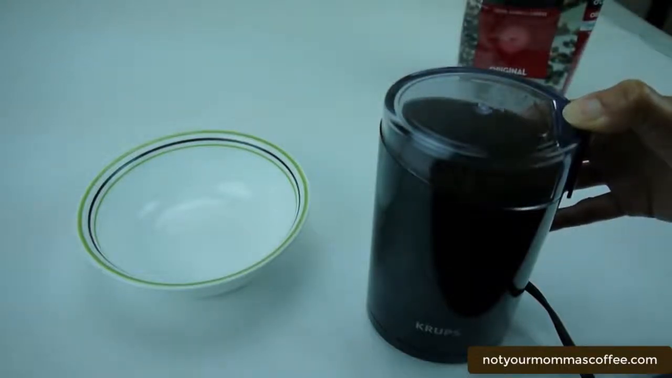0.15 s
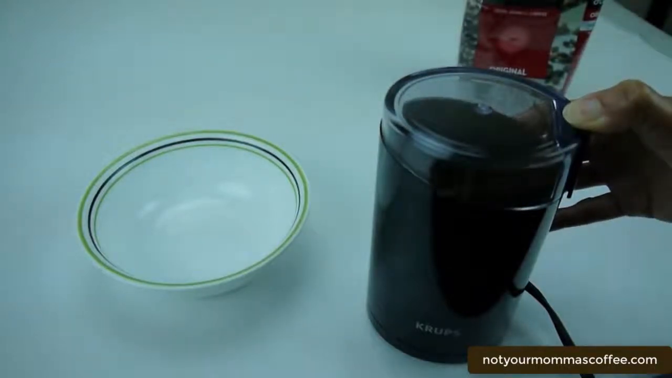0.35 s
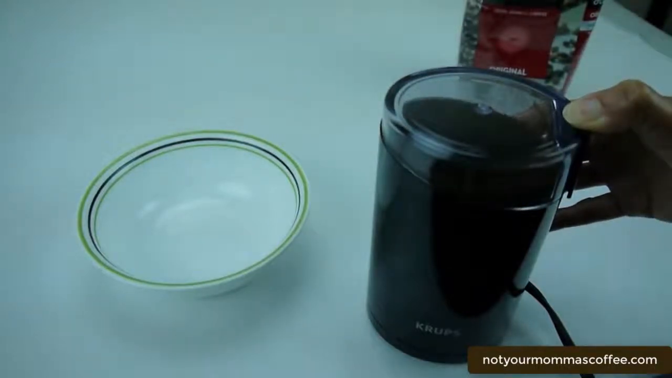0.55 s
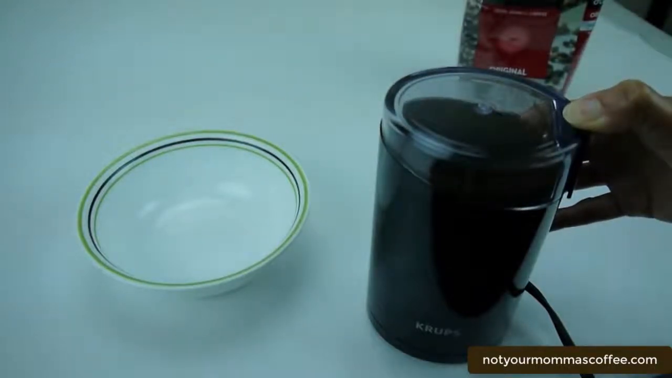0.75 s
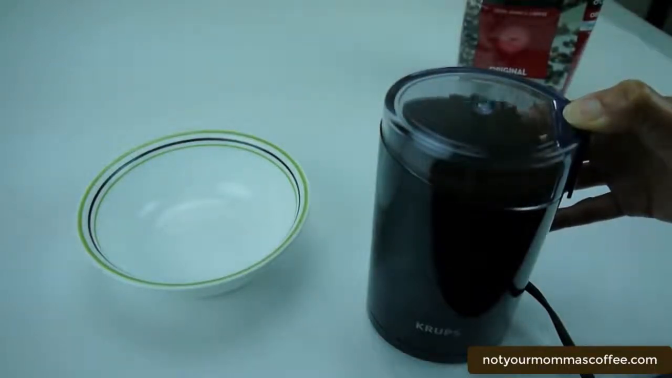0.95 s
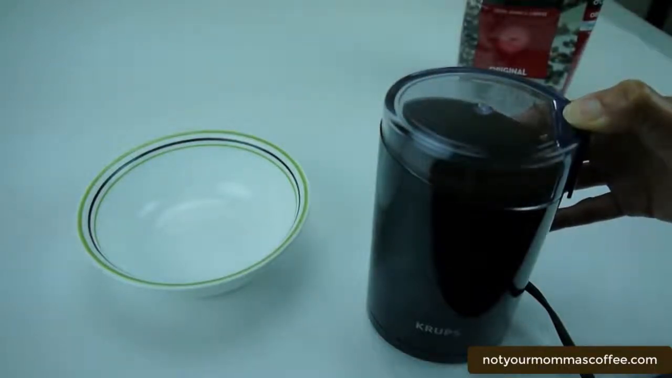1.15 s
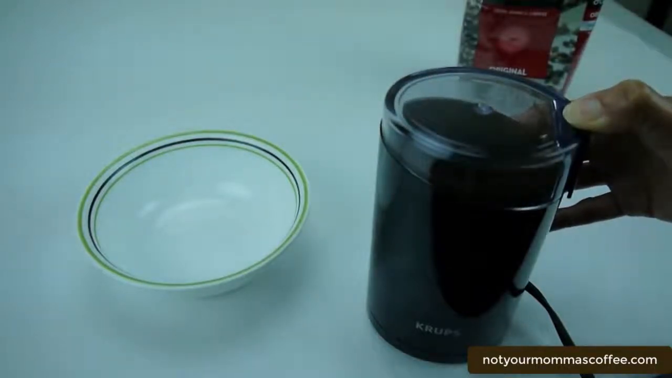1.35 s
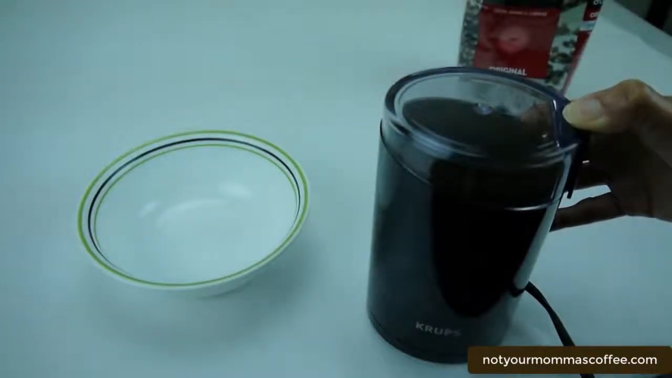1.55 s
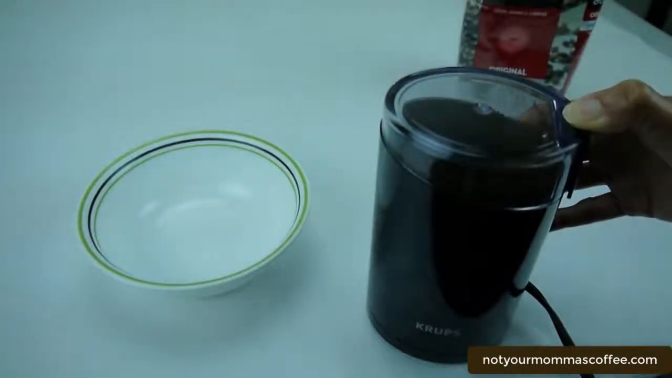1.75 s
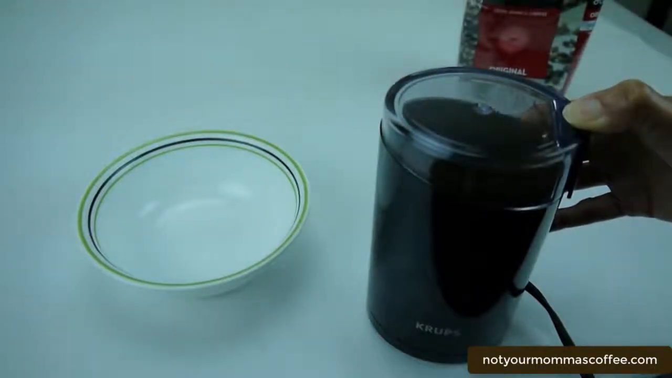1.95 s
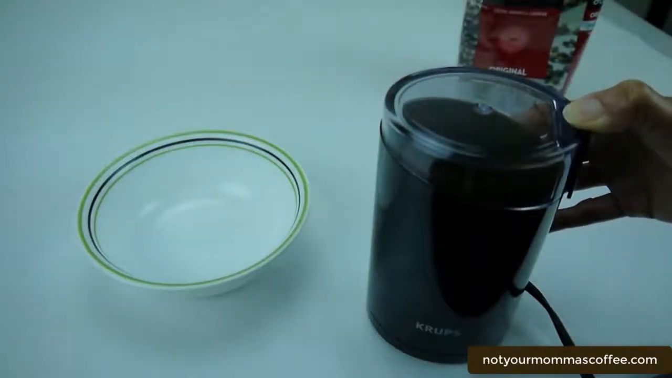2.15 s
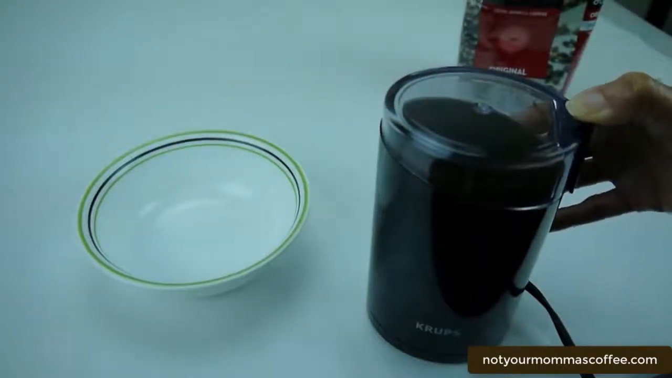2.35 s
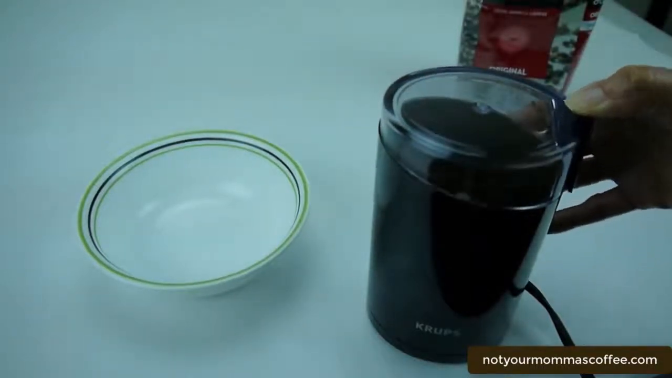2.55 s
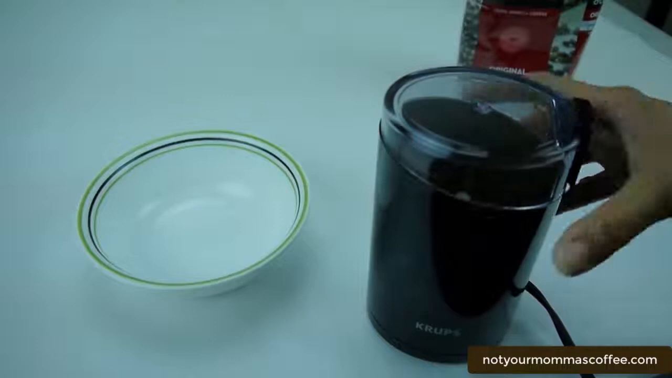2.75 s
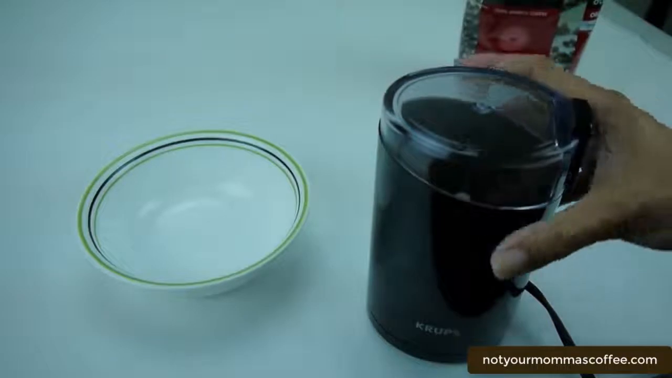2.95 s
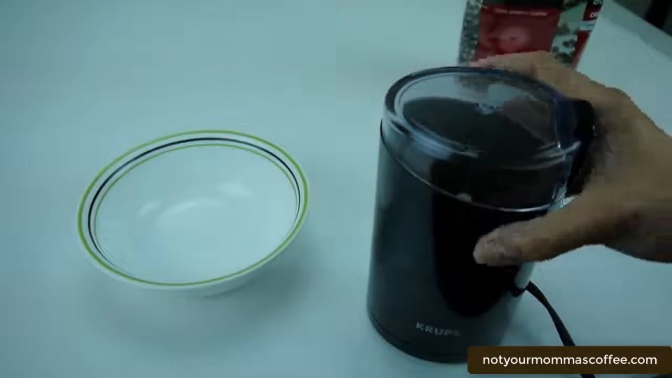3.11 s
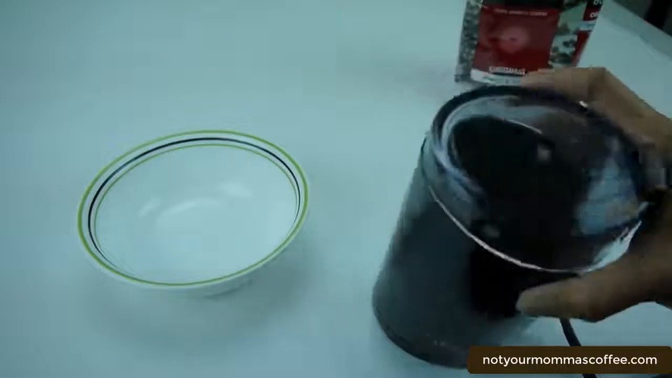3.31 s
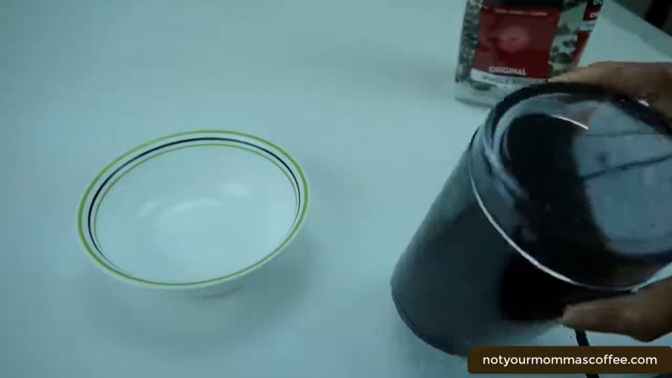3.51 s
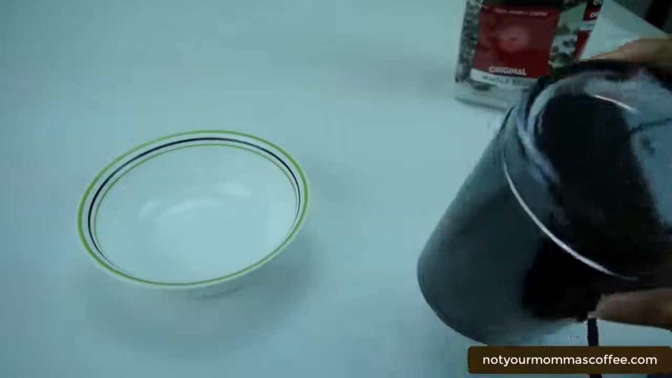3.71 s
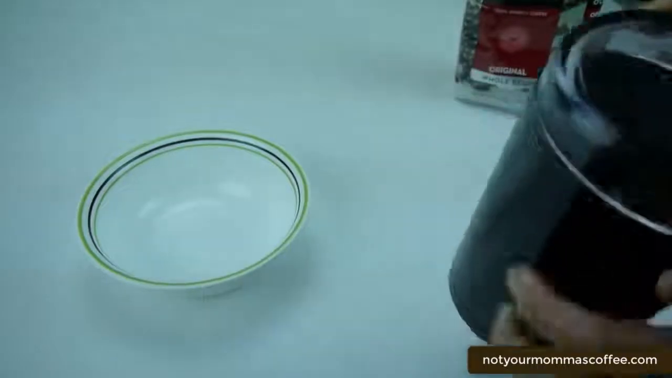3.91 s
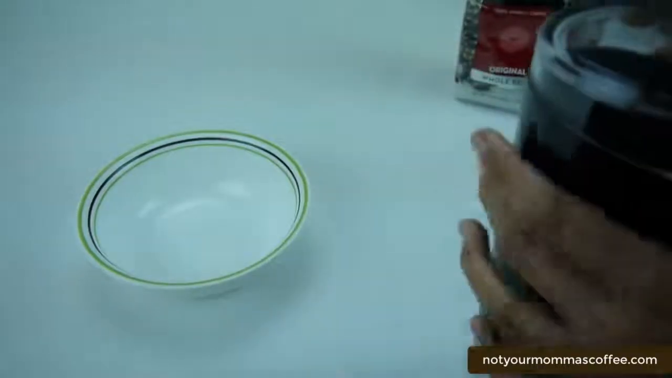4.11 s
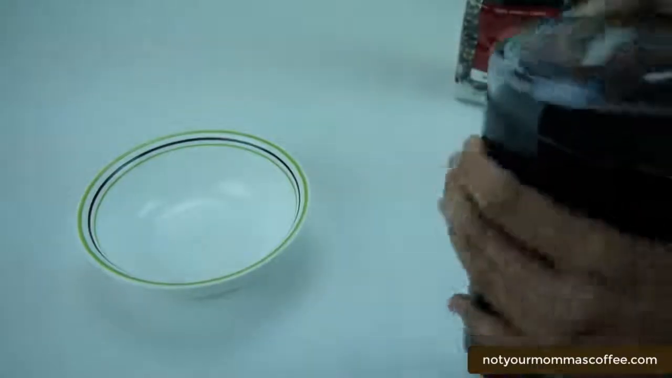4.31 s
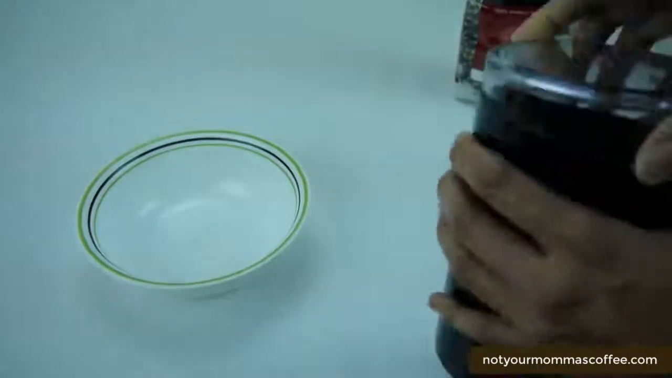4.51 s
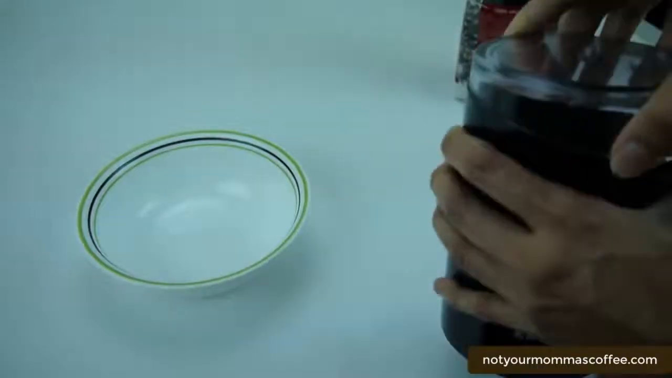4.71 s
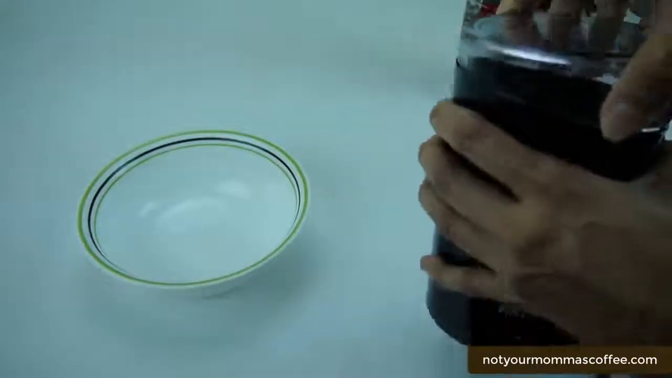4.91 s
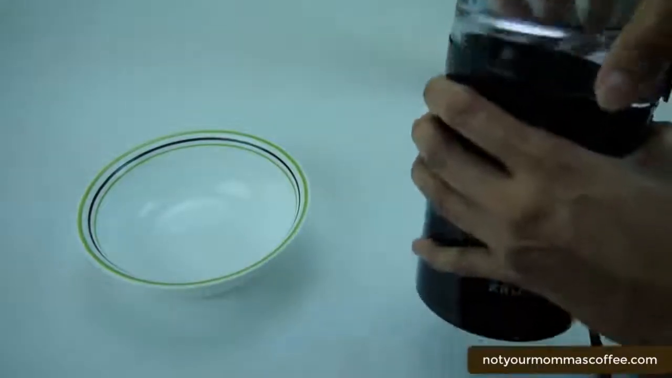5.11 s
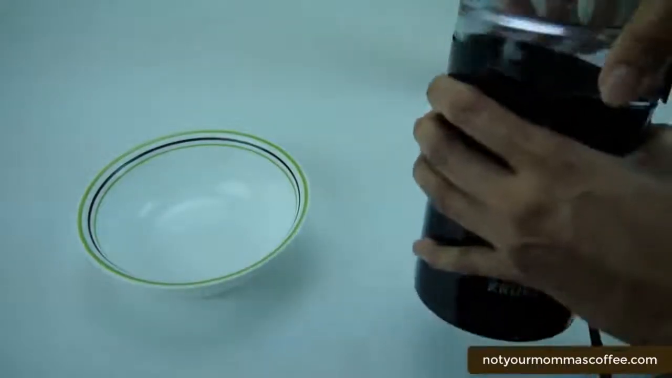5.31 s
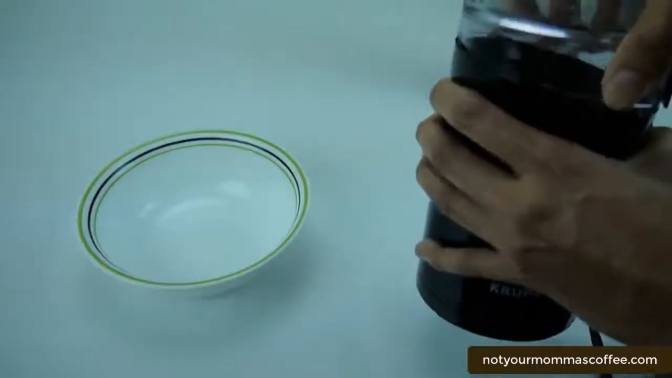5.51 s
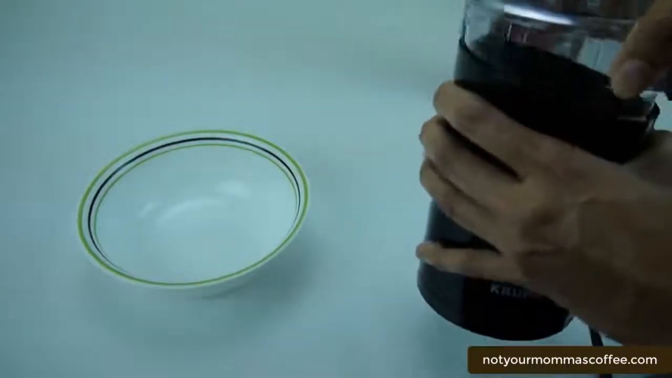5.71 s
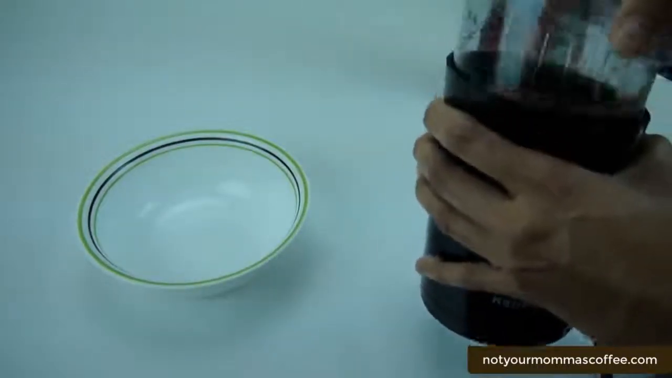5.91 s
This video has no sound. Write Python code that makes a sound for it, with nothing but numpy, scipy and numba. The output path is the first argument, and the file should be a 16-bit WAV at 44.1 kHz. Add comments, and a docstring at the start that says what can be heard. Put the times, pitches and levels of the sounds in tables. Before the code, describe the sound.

Harsh, gritty whir of a coffee grinder on a counter, spinning down after about three seconds, followed by faint plastic clicks and lid scuffs.

```python
"""An electric blade coffee grinder runs on a kitchen counter: lines on the turn rate whine, a hum throbs,
and grounds (noise) and bean chips (bursts) excite the resonances of cup, lid and blade.
The button is let go: the whine and hum die, and the rotor coasts to rest while the counter booms.
Hands then lift the grinder and twist its lid loose: ticks ring the shell, strokes of gritty noise rub,
and the catch gives one dull pop. Room tone lies beneath."""
import sys
import numpy as np
from scipy import signal
from scipy.fft import rfft, irfft
from scipy.io import wavfile
from numba import njit

SR = 44100
rng = np.random.default_rng(int(sys.argv[2]) if len(sys.argv) > 2 else 0)


def to_wav(s):
    """Save 16-bit WAV."""
    ch = np.atleast_2d(s).T  # columns
    pcm = np.round(np.clip(ch, -1, 1) * 32767)  # PCM
    wavfile.write(sys.argv[1], SR, pcm.astype(np.int16))


def ratio(d):
    """dB to gain"""
    e = np.asarray(d, float) / 20
    return 10 ** e


N = 262836
TIME_S = np.arange(N) / SR

# rotor: creeps up as the beans get finer, then brakes by friction once the button is let go
FULL_SPEED_HZ, START_HZ, CREEP_HZ_PER_S = 388, 386.6, 1.0
RELEASE_S, BRAKE_HZ_PER_S, BRAKE_ONSET_S = 2.827, 680, 0.017

# grounds whirling: level at full speed, exponent on the speed, speed share where only settling dust is left
WHIRL_DB, WHIRL_POWER, SETTLING_SHARE, SETTLED_S = -29.5, 1.1, .018, 3.72
SWIRL_LAG_S = 0.035   # the grounds lag behind the blade
# treble of the whirl, and its change as the powder gets fine from that moment on
TREBLE_DB, FINER_S, FINER_DB = 3.5, 1.93, -1
STALL_SHARE, STALL_TREBLE_DB = 0.14, -11   # treble lost as the blade stalls below this speed share
RUMBLE_DB, SLOW_RUMBLE_DB = -4.5, 10   # rumble at full speed, and its gain towards standstill
# slower dust loses its finest sizzle; near standstill the edge sinks further
SIZZLE_HZ, SIZZLE_LOSS_DB = 13800, -46
STALL_SIZZLE_HZ, STALL_SIZZLE_DB = 11800, -29.5
# bean chips thrown hard: start_s, peak_db (of the blow that drives the cup),
# dull_db (dull part against the bright, where a chip strikes the blade rather than the lid)
CHIP_CRACKS = [(0.0638, -15.5, -1), (0.1986, -20, -3.5), (0.351, -18.5, -4.5), (0.3925, -16, -6),
               (0.415, -16.5, -1.5), (0.439, -20, 0), (0.63, -22, -8), (0.6416, -17, -10),
               (0.8788, -15.5, -1), (0.9123, -16.5, -1.5), (1.05, -20, 2.5), (1.271, -17, -6),
               (1.3826, -25, -6.5), (1.4095, -8, -1), (1.418, -19.5, -4), (1.436, -22, -8),
               (1.449, -20.5, 4.5), (1.4815, -18, -1), (1.524, -23, -7), (1.539, -22, -2.5),
               (1.6093, -21, -11), (1.6692, -17, -7.5), (1.733, -27, -5), (1.8555, -20, -5),
               (1.8715, -15, -5.5), (2.1256, -14, -10), (2.2816, -18, -7), (2.332, -24.5, -6),
               (2.35, -26, -6), (2.378, -21.5, -7.5), (2.4228, -18, -6), (2.62, -22, -2), (2.77, -23, 0),
               (2.8102, -26.5, -7), (2.949, -33, -6), (2.9746, -18, 2.5), (3.013, -25, -8),
               (3.035, -25.5, 4), (3.039, -24.5, 4), (3.0937, -17.5, 5.5), (3.1824, -23, 2),
               (3.256, -27, 1.5)]
# bright and dull bands of a crack; slower chips thud on the cup wall as well
SHARD_HZ, DULL_SHARD_HZ, SLOW_SHARD_HZ = [5930, 9750], [3220, 5070], [1830, 2600]
RATTLE_SHARE, RATTLE_S = 0.28, 0.0078   # bits rattling on after a crack
WAVERS_BELOW_HZ, WALL_HZ = 1500, 2030   # cup modes that waver with the load; the mode of the cup wall
# cup and lid resonances: centre_hz, width_hz, level_db (relative)
CUP_MODES = [(336.7, 40, 9), (505, 24, -6), (690, 90, -3.5), (760, 27, 8.7), (868, 40, 5), (1141, 42, 0),
             (1293, 50, -5), (1010, 55, -4.5), (1500, 43, -3.5), (2045, 300, -1.3), (WALL_HZ, 25, -5.5),
             (2500, 80, -22.5), (3495, 37, 1), (6475, 120, -10), (7990, 180, -2), (8950, 30, -5.5),
             (9370, 180, -6), (13450, 110, 6), (14400, 170, 7.1)]
# blade modes, stiffened by the spin: rest_hz, full_speed_hz, width_hz, level_db (relative)
BLADE_MODES = [(4320, 4875, 130, 7), (4230, 4720, 57, 0.5), (4170, 4300, 65, -8.5), (9900, 10350, 250, -1)]
# towards standstill the grounds leave the lid and slide along the cup wall; the unloaded blade rings freely
LID_SLOW_DB, WALL_SLOW_DB, BLADE_SLOW_DB = -32.5, 7, 6.5
# overall spectrum of the grinding: frequency_hz, level_db (relative)
GROUNDS_SPECTRUM = [(100, -23), (240, -43), (400, -11), (600, -25), (900, -19), (1450, -25.5), (1900, -8.5),
                    (3300, -11.5), (5660, -12), (8150, -8.5), (11500, -16), (12700, -22), (14300, -9.5),
                    (14800, -25.5)]
SHUDDER_DB, SHUDDER_HZ = 0.5, [200, 1106]   # broad rumble of the body while the rotor brakes, against the whirl
# the counter booms while the slowing rotor passes its resonance
COUNTER_HZ, COUNTER_REACH_HZ, COUNTER_DB = 134.7, 60, 8.5

# motor lines: turn_multiple, throb_multiple (added), level_db (against the whine), wobble_db
MOTOR_LINES = [(1, 1, -25.5, 9.5), (1, -1, -63.5, 2.5), (2, 0, -17, 5), (3, 0, -21, 7), (3, 1, -19, 6),
               (4, 0, -24, 8.5), (5, 0, -14, 7.5), (8, 0, -1, 1.5), (8, -1, -11, 2), (9, 0, -10.5, 3.5)]
THROB_HZ = 120   # twice the mains frequency
WHINE_DB, WHINE_LOSS_DB_PER_S = -43, 496   # motor lines, dying once the current is cut
HUM_DB, HUM_HANG_S = -49, 0.076   # hum; 10 dB down this long after the release
# unbalance tone, swelling as the load shifts: time_s, level_db
UNBALANCE_LEVEL = [(0, -43.5), (.7, -45), (1.1, -41.5), (1.6, -43.5), (2.4, -40.5), (2.8, -45.5),
                   (2.9, -46)]
MOUNT_HZ, BELOW_MOUNT_DB_PER_HZ = 304, 1   # the tone dies below the resonance of the mount

# lid and body ticks in the hands: start_s, strength_db, clack_hz, knock_db, snap_db (both against the strength)
HAND_TICKS = [(3.4578, -47, 2030, -27, 4), (3.459, -44, 3450, -25, -8), (3.4657, -46.5, 4020, -25, 2),
              (3.489, -49, 3300, -16, -2), (3.6142, -60, 1900, -23, -5), (3.642, -52, 8580, -25, -5),
              (3.769, -52, 3300, -23, -1), (3.774, -51, 2090, -23, -4), (4.2933, -62, 2030, -5, -14),
              (4.594, -45, 1980, -28, -13), (4.596, -48, 3300, -27, -10), (4.6094, -48, 3370, -27, -10),
              (4.6664, -50, 2040, -13, 1), (4.7108, -47.5, 2040, -28, 5), (4.7635, -43.5, 1950, -28, 10),
              (4.7676, -35.5, 6860, -29, 0.5), (4.7824, -35.5, 3300, -29, -8),
              (4.9144, -56, 2650, -21, -18), (4.929, -54, 2030, -25, -18), (4.935, -55, 2700, -25, -18),
              (4.972, -47, 2030, -27, -14), (5.006, -48, 2100, -20, -11), (5.013, -57, 550, -6, -20),
              (5.021, -48, 2030, -28, -8), (5.037, -48, 2030, -27, -20), (5.0674, -50.5, 2010, -32, -1),
              (5.2175, -56, 4940, -18, 0), (5.241, -52, 2220, -10, -13), (5.285, -61, 3300, -27, -12),
              (5.3067, -51, 2000, -28, -10), (5.3517, -47.5, 2200, -11, 0), (5.391, -51, 1940, -12, -15),
              (5.4236, -52, 1990, -9, -9), (5.46, -46, 2100, -8.5, -4), (5.517, -53, 3400, -19, -11),
              (5.552, -52, 3000, -25, -3), (5.5554, -42, 2030, -26, -9), (5.571, -62, 704, 1, -20),
              (5.587, -55, 2050, -18, -20), (5.6138, -47, 1970, -12, 1), (5.683, -54, 2240, -8, 0),
              (5.686, -56.5, 590, 2.5, -20), (5.7038, -50, 2010, -7, -12), (5.79, -44, 2060, -16, -20),
              (5.8114, -48, 2060, -4, -6), (5.8374, -52.5, 331, -10, -16), (5.843, -49, 1980, -20, -8),
              (5.8846, -56.5, 804, 1, -20), (5.8915, -63, 905, 1, -18), (5.896, -50, 2000, -5, -15),
              (5.909, -53, 2080, -15, -20), (5.9232, -44, 4770, -22, -17), (5.93, -48, 4640, -22, -2),
              (5.951, -53.5, 1300, -10, -15)]
# modes that a tick rings: frequency_hz, level_db (relative), t60_s
SHELL_MODES = [(417, 6, 0.015), (550, 8.5, 0.0077), (2030, -13.5, 0.067), (2160, -7, 0.034),
               (3360, -12, 0.049), (6070, -4.5, 0.032), (7400, -17, 0.03)]
# shell ring of a tick of reference strength; other ticks ring in proportion
RING_DB, REFERENCE_TICK_DB = -55, -47
SNAP_WAKES = .7   # the upper shell modes follow this share of the snap
LOOSE_S, SEATED_RING_DB = 4.4, -8   # until the lid is twisted loose, it damps the shell
CLACK_CYCLES, CLACK_GRIT = 9.6, 0.59   # a clack dies to 1/e in this many cycles; its noisy share
POP_S, POP_DB, POP_HZ, POP_DECAY_S = 4.9885, -32, 1450, 0.00056   # the lid catch lets go

# skin and lid rim rubbing, stroke by stroke: start_s, time_scale_s, bright_db
RUBBING_STROKES = [(4.442, 0.25, -79), (4.586, 0.034, -63), (4.663, 0.13, -73), (4.738, 0.13, -69),
                   (4.895, 0.092, -78), (4.972, 0.064, -65.5), (5.084, 0.081, -80), (5.195, 0.12, -64),
                   (5.346, 0.077, -72), (5.416, 0.11, -62), (5.562, 0.12, -72), (5.662, 0.1, -69),
                   (5.785, 0.062, -65.5), (5.875, 0.076, -69)]
# spectrum of the bright rubbing: frequency_hz, level_db (relative)
RUBBING_SPECTRUM = [(1470, -30), (2500, -11), (3390, 1.5), (5140, -3.5), (7460, -3.5), (13300, -16),
                    (14800, -11)]
# lid rim resonances: frequency_hz
RIM_MODES_HZ = [3300, 4480, 5900, 7250.]
# dull part of a stroke of reference strength, which follows only part of the strength
DULL_RUB_DB, DULL_FOLLOWS, REFERENCE_RUB_DB = -72.5, 0.43, -70

# bands that thin out now and then: centre_hz, width_hz, depth_bias (0-1)
THINNED_BANDS = [(240, 130, 1), (615, 150, .8), (1010, 100, .4), (1430, 130, .6)]
THIN_BASS_S, THIN_BASS_HZ, THIN_BASS_WIDTH_HZ = [2.94, 3.12], 150, 140   # the bass is thin for a moment
ROOM_T60_S, ROOM_DB = 0.21, -6
# side signal spectrum: frequency_hz, gain_db
SIDE_SPECTRUM = [(60, -5.5), (110, -12.5), (200, -16.5), (370, -14), (680, -10), (1260, -6), (2310, -12.5),
                 (4250, -12.5), (7800, -15.5), (12000, -9.5), (14300, -1)]
# room tone spectrum: frequency_hz, level_db (relative, per Hz)
ROOM_TONE_SPECTRUM = [(12, -34.5), (20, -26.5), (32, -31.5), (98, -21), (136, -30), (278, -39.5),
                      (481, -41), (567, -46.5), (787, -46), (2630, -59), (7660, -65), (9280, -55),
                      (11800, -62.5), (12600, -84)]
ROOM_TONE_DB, ROOM_TONE_SIDE_DB = -64.5, -95.5
# above this edge the room tone is fainter while the rotor runs fast
FAINTER_ABOVE_HZ, FAINTER_DB = 140, -22


def rms_one(x):
    """Normalisation: scales to unit root mean square."""
    return x / np.sqrt(np.mean(x ** 2) + 1e-20)


def since(s):
    """Elapsed time: seconds gone by since a moment, 0 before it."""
    return np.maximum(TIME_S - s, 0)


def drift(rate_hz):
    """Low-pass random process: twice-smoothed noise of spread 1, computed at every 40th sample."""
    r = np.exp(-80 * np.pi * rate_hz / SR)
    slow = signal.lfilter([1], [1, -2 * r, r * r], rng.standard_normal(N // 40 + 2002))[2000:]
    return np.interp(np.arange(N) / 40, np.arange(len(slow)), rms_one(slow))


def colour(x, spectrum):
    """Minimum-phase filtering: a folded cepstrum gives the causal response of a spectrum."""
    hz, db = np.transpose(spectrum)
    grid = np.maximum(np.fft.rfftfreq(8192, 1 / SR), 1)
    cepstrum = irfft(np.interp(np.log(grid), np.log(hz), db) * np.log(10) / 20)
    cepstrum[1:4096] *= 2
    cepstrum[4097:] = 0
    response = irfft(np.exp(rfft(cepstrum)))
    return signal.fftconvolve(np.atleast_2d(x), [response], axes=1)[:, :N]


def cut(x, hz, kind, order=2):
    """Butterworth filtering: maximally flat pass band."""
    return signal.sosfilt(signal.butter(order, hz, kind, fs=SR, output="sos"), x)


def split(x, hz, order):
    """Crossover: each half is filtered twice; returns low and high."""
    return [cut(cut(x, hz, kind, order), hz, kind, order) for kind in ("low", "high")]


@njit
def resonate(x, hz, width):
    """Two-pole resonance whose centre may move; gain 1 on top."""
    y, r = np.zeros(len(x)), np.exp(-np.pi * width / SR)
    for i in range(2, len(x)):
        pushed = (1 - r * r) / 2 * (x[i] - x[i - 2])
        y[i] = pushed + 2 * r * np.cos(2 * np.pi * hz[i] / SR) * y[i - 1] - r * r * y[i - 2]
    return y


def grains(per_s, spread_db, lasting_s):
    """Shot noise: random contacts, a few much larger than the rest, each a short noise burst; rms 1."""
    sizes = ratio(spread_db * np.minimum(rng.exponential(1, N), 2.9)) * (rng.random(N) < per_s / SR)
    r = np.exp(-1 / (lasting_s * SR))
    return rms_one(signal.lfilter([1], [1, -r], sizes) * rng.standard_normal(N))


def rotor():
    """Friction braking: a constant loss of speed after a short onset; returns turns per second."""
    off = since(RELEASE_S)
    braked = BRAKE_HZ_PER_S * (off - BRAKE_ONSET_S * (1 - np.exp(-off / BRAKE_ONSET_S)))
    return np.maximum(START_HZ + CREEP_HZ_PER_S * np.minimum(TIME_S, RELEASE_S) - braked, 0)


def chip_cracks(share):
    """Impact excitation: a chip shatters in a sharp noise burst and its bits rattle on."""
    t = np.arange(800) / SR
    out = np.zeros(N)
    burst = (1 - np.exp(-t / 0.00042)) * (np.exp(-t / 0.001) + RATTLE_SHARE * np.exp(-t / RATTLE_S))
    for s, peak_db, dull_db in CHIP_CRACKS:
        start = round(s * SR)
        bits = rng.standard_normal(len(t))
        shard = cut(bits, SHARD_HZ, "band") + ratio(dull_db) * cut(bits, DULL_SHARD_HZ, "band")
        shard += 2.5 * (1 - share[start]) * cut(bits, SLOW_SHARD_HZ, "band")
        blow = burst * shard
        out[start:start + len(t)] += ratio(peak_db) * blow / np.abs(blow).max()
    return out


def cup_and_blade(drive, speed, share):
    """Modal resonance: one drive excites the modes of cup, lid and spin-stiffened blade."""
    rung = ratio(-2.5) * cut(drive, 1300, "high") + ratio(-24) * drive
    for hz, width, db in CUP_MODES:
        centre, gain_db = np.full(N, float(hz)), db
        wavers = hz < WAVERS_BELOW_HZ
        if wavers:   # the low modes come, go and wander as the load shifts round the cup
            gain_db = db + 4.5 * share * np.minimum(drift(8), .8)
            centre = hz * (1 + 0.015 * drift(2))
        ring = resonate(drive, centre, float(width))
        if wavers:   # a second, wider pass steepens the skirts: the sound is thin between these modes
            ring = ratio(4.0) * resonate(ring, centre, width * 2.5)
        slow_db = LID_SLOW_DB if hz > 7000 else WALL_SLOW_DB * (hz == WALL_HZ)
        rung = rung + ratio(gain_db + slow_db * (1 - share)) * ring
    stiffening = (speed / FULL_SPEED_HZ) ** 2
    for rest_hz, full_hz, width, db in BLADE_MODES:
        centre = np.sqrt(rest_hz ** 2 + (full_hz ** 2 - rest_hz ** 2) * stiffening)
        gain = ratio(db + BLADE_SLOW_DB * (1 - share)) * share ** .2
        rung = rung + gain * resonate(drive, centre, float(width))
    return rung


def grinding(speed):
    """Source and resonator: dust hiss, grit and cracks all excite the same cup, lid and blade."""
    share = np.clip(speed / FULL_SPEED_HZ, 0, 1)
    slowed = 1 - share
    keep = np.exp(-1 / (SWIRL_LAG_S * SR))
    swirl = 1 - signal.lfilter([1 - keep], [1, -keep], slowed)
    level_db = WHIRL_DB + 20 * WHIRL_POWER * np.log10(np.maximum(swirl, 0) + SETTLING_SHARE)
    fading = np.clip((SETTLED_S - TIME_S) / 0.083, 0, 1)
    whirl = rng.standard_normal(N) + .5 * grains(450, spread_db=4.5, lasting_s=0.0018)
    drive = rms_one(whirl) * ratio(level_db + 0.97 * drift(21) + 0.12 * drift(1.6)) * fading
    drive = drive + chip_cracks(share)

    heard = colour(cup_and_blade(drive, speed, share), GROUNDS_SPECTRUM)[0] * ratio(12.0)
    body, sizzle = split(heard, SIZZLE_HZ, order=6)
    heard = body + ratio(SIZZLE_LOSS_DB * slowed) * sizzle
    body, sizzle = split(heard, STALL_SIZZLE_HZ, order=6)
    heard = body + ratio(STALL_SIZZLE_DB * slowed ** 3) * sizzle

    shudder_gain = ratio(level_db + SHUDDER_DB + 2.7 * drift(15)) * slowed ** 0.78 * fading
    shudder = shudder_gain * cut(rng.standard_normal(N), SHUDDER_HZ, "band", order=4)
    counter = np.full(N, COUNTER_HZ)
    boom = resonate(resonate(drive, counter, 40.), counter, 60.)
    passing = np.exp(-((speed - COUNTER_HZ) / COUNTER_REACH_HZ) ** 2)
    shudder = shudder + ratio(COUNTER_DB) * passing * boom

    treble_db = TREBLE_DB + FINER_DB * np.tanh(since(FINER_S) / 0.13)
    treble_db = treble_db + STALL_TREBLE_DB * np.maximum(1 - share / STALL_SHARE, 0)
    rumble_db = RUMBLE_DB + SLOW_RUMBLE_DB * slowed
    bright, dull = cut(heard, 4600, "high"), cut(heard, 1500, "low")
    return heard + (ratio(treble_db) - 1) * bright + (ratio(rumble_db) - 1) * dull + shudder


def motor(speed):
    """Rotating unbalance and torque modulation: turn-rate lines with neighbours a throb away, and field hum."""
    off = since(RELEASE_S)
    shake_hz = 0.752 + 0.2 * np.abs(np.gradient(speed)) * SR / 20   # shakier while the speed drops
    turn = 2 * np.pi * np.cumsum(speed + shake_hz * drift(8.8)) / SR
    throb = 2 * np.pi * THROB_HZ * TIME_S
    whine = np.zeros(N)
    for turns, throbs, db, wobble_db in MOTOR_LINES:
        whine += ratio(db + wobble_db * drift(13.0)) * np.sin(turns * turn + throbs * throb)
    whine *= ratio(WHINE_DB - WHINE_LOSS_DB_PER_S * off)
    tone_db = np.interp(TIME_S, *np.transpose(UNBALANCE_LEVEL))
    tone_db = tone_db - BELOW_MOUNT_DB_PER_HZ * np.maximum(MOUNT_HZ - speed, 0)
    tone = ratio(tone_db + (1.0 + 5.3 * (off > 0)) * drift(21)) * np.sin(turn)
    hum = ratio(HUM_DB - 10 * (off / HUM_HANG_S) ** 2 + 2.6 * drift(23)) * np.sin(throb)
    return np.sqrt(2) * (tone + whine + hum)


def ticks():
    """Impulse response: each broad clack has a pitch of its own, knocks the body and rings the shell."""
    t, out = np.arange(3000) / SR, np.zeros(N + 3000)
    for s, strength_db, pitch_hz, knock_db, snap_db in HAND_TICKS:
        puff = rng.standard_normal(len(t)) * (1 - np.exp(-t / .0006)) * np.exp(-t / .0025)
        snap = cut(cut(puff, 11000, "low"), [3000, 8000], "band")
        sound = ratio(snap_db) * snap + ratio(-33) * cut(puff, [900, 3000], "band")

        clack = resonate(puff, np.full(len(t), float(pitch_hz)), .1 * pitch_hz)
        clack = cut(clack, 1.5 * pitch_hz, "low")
        decay = np.exp(-t * pitch_hz / CLACK_CYCLES)
        tone = (1 - np.exp(-t / 0.0005)) * decay * np.sin(2 * np.pi * pitch_hz * t)
        gritty = CLACK_GRIT * clack / np.abs(clack).max()
        sound += ratio(-1.0) * (gritty + (1 - CLACK_GRIT) * 1.54 * tone)

        # relative to the tick, which is scaled by its strength at the end
        ring_db = RING_DB - REFERENCE_TICK_DB + SEATED_RING_DB * (s < LOOSE_S)
        for hz, db, t60 in SHELL_MODES:
            mode_db = knock_db if hz < 900 else ring_db + SNAP_WAKES * snap_db * (hz > 3000)
            envelope = ratio(mode_db + db + rng.normal(0, 3.5) - 60 * t / t60)
            sound += envelope * (1 - np.exp(-t / 0.00079)) * np.sin(2 * np.pi * hz * t)
        start = round(s * SR)
        out[start:start + len(t)] += ratio(strength_db) * sound
    return out[:N]


def pop():
    """Heavy damping: the released catch swings a couple of cycles."""
    t = since(POP_S)
    envelope = (1 - np.exp(-t / 0.00018)) * np.exp(-t / POP_DECAY_S)
    return -ratio(POP_DB) * envelope * np.sin(2 * np.pi * POP_HZ * t)


def rubbing():
    """Gritty friction: strokes swell fast and die slowly, a bright hiss and a dull part that wakes the shell."""
    bright_gain, dull_gain = np.zeros((2, N))
    for s, scale_s, bright_db in RUBBING_STROKES:
        done = np.clip((TIME_S - s) / scale_s, 0, 3)
        stroke = 4 * done * np.exp(-1.6 * done ** 1.7) * (done < 3)
        bright_gain += ratio(bright_db) * stroke
        dull_gain += ratio(DULL_RUB_DB + DULL_FOLLOWS * (bright_db - REFERENCE_RUB_DB)) * stroke
    grit = rng.standard_normal(N) + .35 * grains(400, spread_db=2.5, lasting_s=.002)
    dull = cut(grit, [300, 2500], "band") + resonate(grit, np.full(N, 2040.), 140.0)
    rim = sum(resonate(grit, hz * (1 + 0.14 * drift(4.5)), 200.0) for hz in RIM_MODES_HZ)
    bright = colour(grit + 0.24 * rim, RUBBING_SPECTRUM)[0]
    return bright_gain * rms_one(bright) + dull_gain * rms_one(dull)


def thinned(x, speed):
    """Notch filtering: wandering bands thin out by chance near full speed, and the bass briefly after release."""
    running = np.clip(4 * speed / FULL_SPEED_HZ - 3, 0, 1)
    notches = []
    for hz, width, bias in THINNED_BANDS:
        depth = running * np.clip(bias + 1.2 * drift(4), 0, 1)
        notches.append((hz * (1 + .025 * drift(3)), width, depth))
    start_s, end_s = THIN_BASS_S
    bass_depth = np.clip(np.minimum(TIME_S - start_s, end_s - TIME_S) / .02, 0, 1)
    notches.append((np.full(N, float(THIN_BASS_HZ)), THIN_BASS_WIDTH_HZ, bass_depth))
    for hz, width, depth in notches:
        for _ in range(2):
            x = x - depth * resonate(x, hz, float(width))
    return x


def room(x):
    """Reverberation: convolution with decaying noise, unrelated for the middle and the side."""
    t = np.arange(SR // 2) / SR
    tail = rng.standard_normal((2, len(t))) * ratio(-60 * t / ROOM_T60_S) * (t > .004)
    return signal.fftconvolve([x], rms_one(tail) / np.sqrt(len(t)), axes=1)[:, :N]


def room_tone(speed):
    """Coloured noise: above its lowest part, the middle grows fainter while the rotor runs fast."""
    mid, side = rms_one(colour(rng.standard_normal((2, N)), ROOM_TONE_SPECTRUM))
    low, high = split(mid, FAINTER_ABOVE_HZ, order=4)
    mid = low + ratio(FAINTER_DB * np.clip(2 * speed / FULL_SPEED_HZ - .5, 0, 1)) * high
    return ratio(ROOM_TONE_DB) * mid, ratio(ROOM_TONE_SIDE_DB) * side


def scene():
    """Superposition: sources and room add up in middle and side, then become left and right."""
    speed = rotor()
    lines = motor(speed)
    contact = grinding(speed) + ticks() + pop() + rubbing()
    walls, around = room(contact)
    tone_mid, tone_side = room_tone(speed)
    mid = lines + contact + ratio(ROOM_DB) * cut(walls, [1300, 8000], "band") + tone_mid
    mid = thinned(mid, speed)
    side = colour(around + lines * drift(12.0), SIDE_SPECTRUM)[0] + tone_side
    return np.array([ratio(1.76) * (mid + side), ratio(2.5) * (mid - side)])


def roll_off(x):
    """The treble ends steeply here."""
    return signal.sosfilt(signal.butter(12, 14940, fs=SR, output="sos"), x)


def record(dry):
    """Band limiting and bias: the top is cut and the converter sits slightly off zero."""
    top = signal.cheby2(12, 60, 14620, fs=SR, output="sos")
    mix = signal.sosfilt(top, dry) + .005
    return roll_off(mix)


dry = scene()
out = record(dry)
to_wav(out)
```